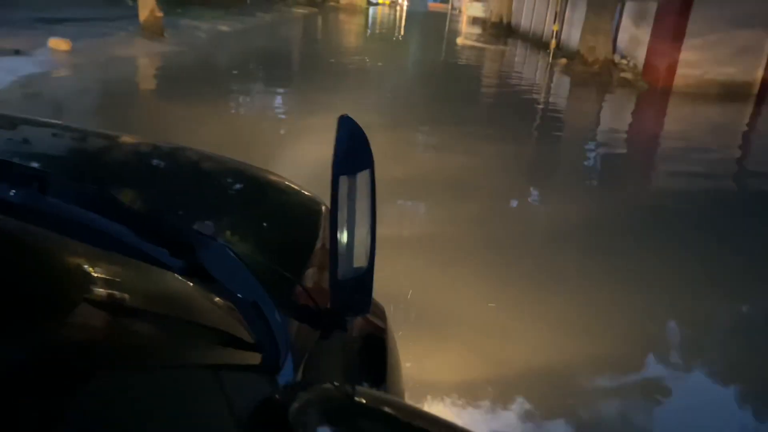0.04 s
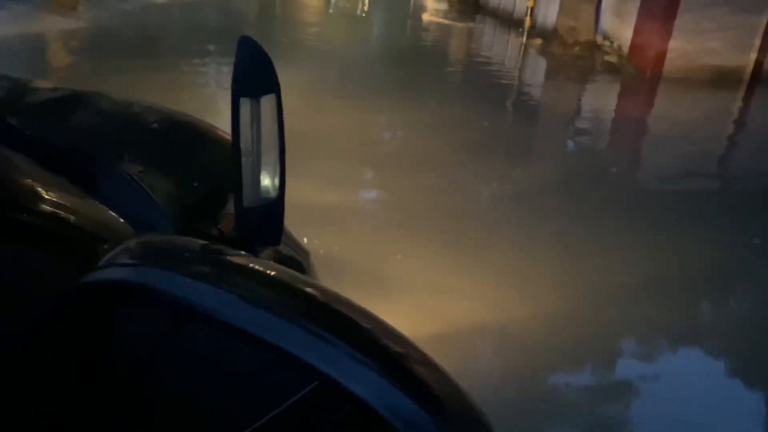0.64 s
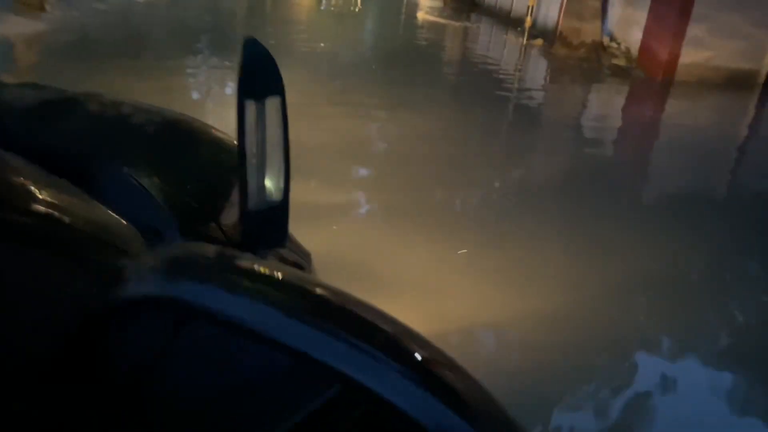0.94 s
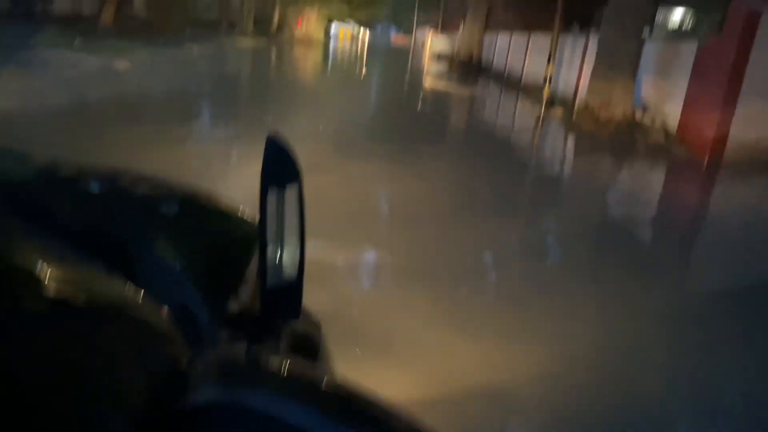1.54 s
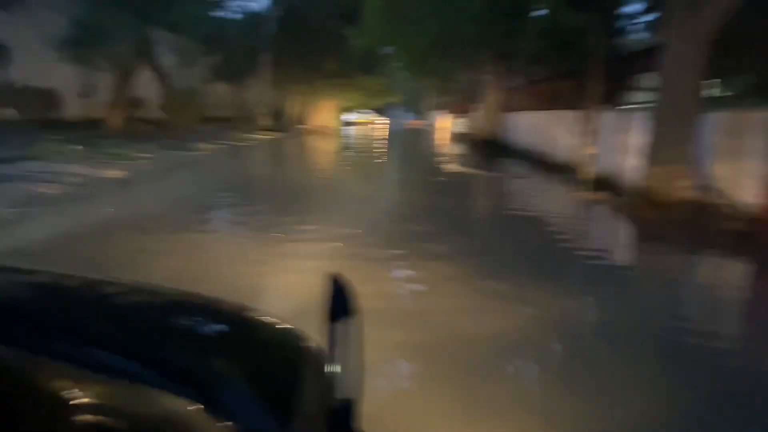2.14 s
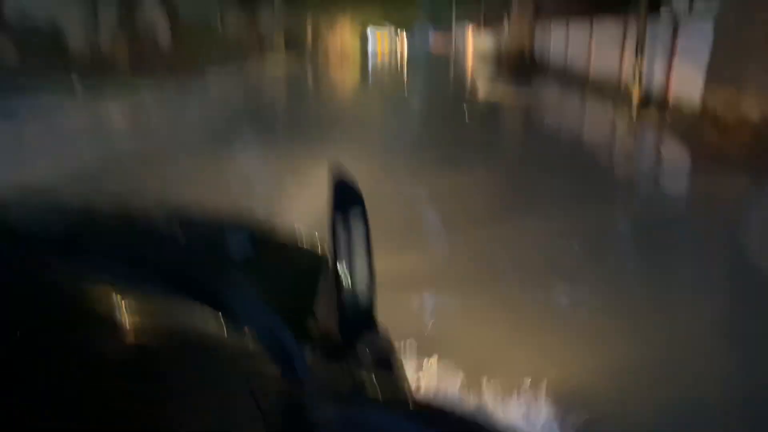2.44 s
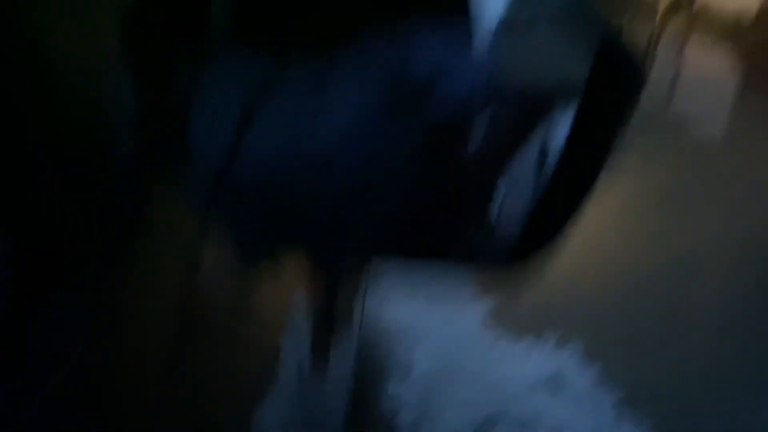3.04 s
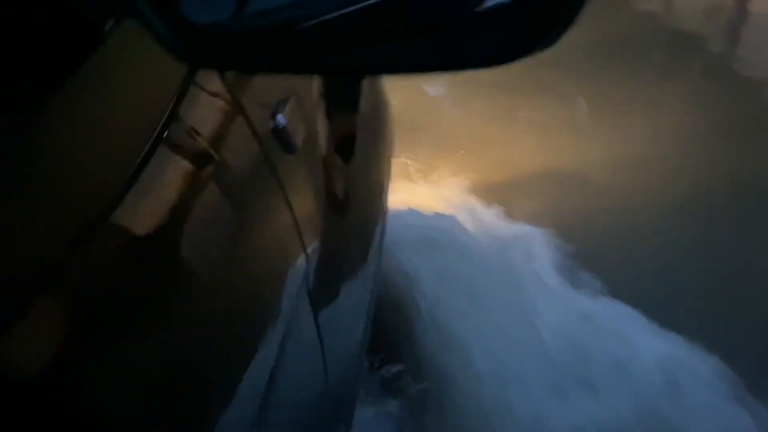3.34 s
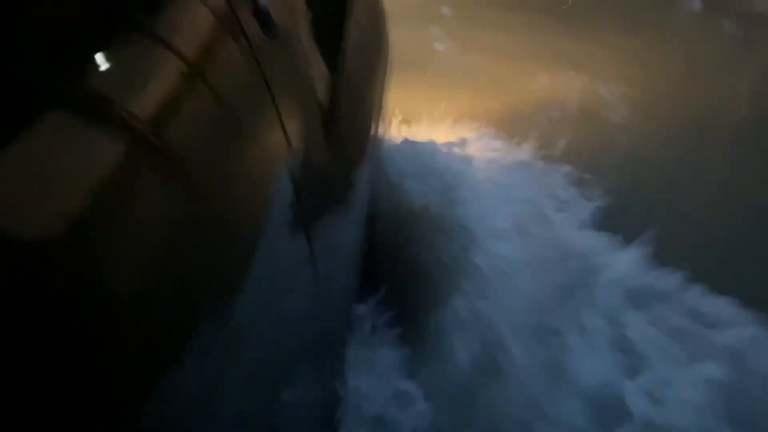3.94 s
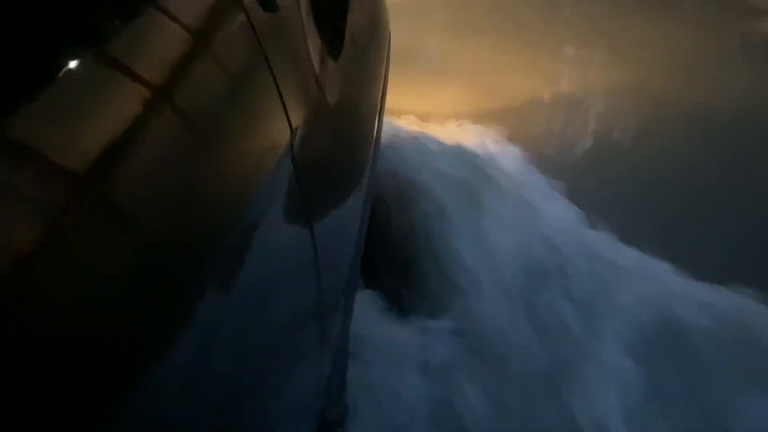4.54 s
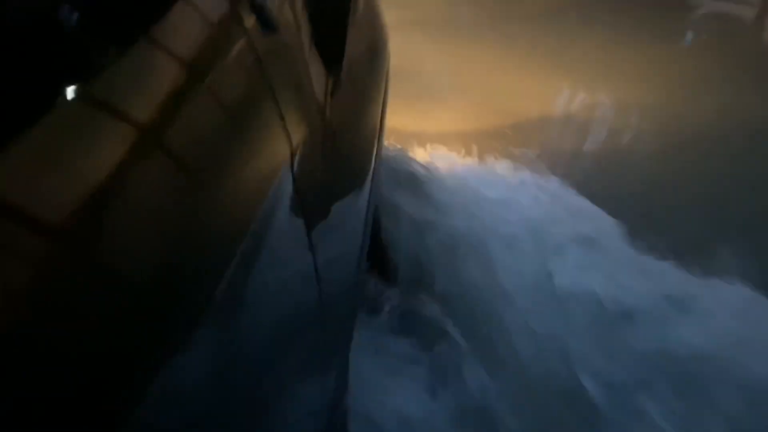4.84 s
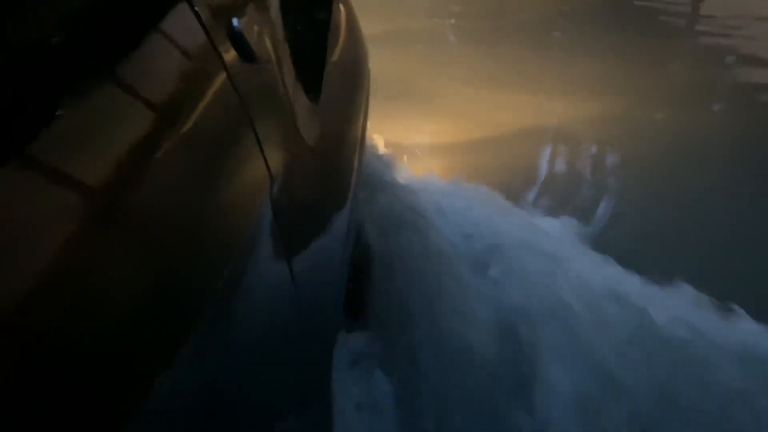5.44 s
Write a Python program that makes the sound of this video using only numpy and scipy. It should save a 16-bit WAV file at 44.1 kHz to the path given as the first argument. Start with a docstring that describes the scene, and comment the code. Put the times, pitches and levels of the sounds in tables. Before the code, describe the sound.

Close, continuous rushing and gurgling of a bow wave as a car drives through deep floodwater, with the microphone held out of the side window in low, lumpy wind. A few sharp slaps hit the panels early on. A run of hollow gulps and low thuds follows at the wheel, and the spray turns brighter. Lighter splashes, drips and one faint, thin squeak come later while the water keeps churning.

```python
"""A flooded road, heard from the open side window of a car wading through deep water.
Wind buffets the microphone as it leans out past the mirror; the front wheel sloshes and gulps air.
Waves slap, knock and thud against the body, sheets of water splat down, and one thin squeak slips by.
Up front, the bow wave churns and bubbles along the door and its crest breaks into fizzing spray."""
import sys
import numpy as np
from scipy import signal
from scipy.fft import rfft, irfft, next_fast_len
from scipy.io import wavfile
from scipy.ndimage import map_coordinates

SR = 44100
rng = np.random.default_rng(int(sys.argv[2]) if len(sys.argv) > 2 else 0)


def wav_out(sig):
    """Save sig, one row per channel (or a flat mono array), as 16-bit PCM at SR to the path in sys.argv[1]."""
    wavfile.write(sys.argv[1], SR, np.round(np.clip(np.atleast_2d(sig).T, -1, 1) * 32767).astype(np.int16))


N = 246078

# Air at the window. Each row: time in seconds, relative level in dB.
WIND_RIDE = [(0.0, -31), (0.57, -31), (1.23, -29.5), (1.66, -31.5), (2.8, -29.5), (3.12, -25.5), (3.4, -27),
             (3.67, -28), (3.95, -30.5), (4.35, -36.5), (5.02, -34), (5.58, -35.5)]
# Eddies that catch the microphone. Each row: crest time in seconds, half-length in seconds, boost in dB.
BUFFETS = [(2.26, 0.13, 3), (2.973, 0.094, 1.5), (3.6, 0.076, 5), (4.645, 0.032, 8)]
# The wind's low rumble. Each row: frequency in Hz, gain in dB.
WIND_EQ = [(20, -25), (32, -24), (48, -1.5), (65, -2.5), (110, -3), (160, -8), (260, -17), (600, -34),
           (1500, -68)]
# Sloshing at the front wheel, fading as the microphone turns back along the door.
# Each row: time in seconds, level in dB.
SLOSH_RIDE = [(0, -34), (.75, -31.5), (1.17, -28.5), (1.3, -35), (1.58, -39), (1.88, -38), (2.2, -31),
              (2.75, -37), (3.3, -23.5), (4.3, -48), (5.58, -31)]
# The hollow tone of the slosh. Each row: frequency in Hz, gain in dB.
SLOSH_EQ = [(80, -25), (140, -3), (200, -4), (320, -0.5), (480, -3), (900, -24), (3000, -60)]
# Big air pockets swallowed at the wheel arch. Each row: start in seconds, level in dB, first pitch in Hz.
GULPS = [(1.286, -20, 327), (1.669, -13.5, 634), (1.696, -15, 330), (1.991, -17, 282), (2.04, -22.5, 300),
         (2.574, -14.5, 490), (3.124, -11.5, 448), (3.308, -7.5, 350), (3.418, -15, 400),
         (3.524, -14.5, 478), (3.582, -21, 425), (3.754, -16, 490), (3.918, -17, 260), (3.934, -16, 473),
         (4.035, -18, 490), (4.225, -16, 296), (4.364, -19.5, 720), (4.481, -19, 606), (4.528, -27, 560),
         (4.619, -18, 400), (4.662, -17, 388), (4.791, -18, 400), (4.883, -23, 560), (5.09, -16.5, 450),
         (5.437, -22, 590)]
# Drops landing close by. Each row: start in seconds, level in dB, pitch in Hz.
DROPS = [(.935, -25, 6130), (4.15, -20, 6700), (4.902, -27, 3220), (5.188, -14, 14500), (5.383, -15, 14800)]
# Sheets of water landing on the flood.
# Each row: start in seconds, level in dB, band centre in Hz, seconds to fade by 60 dB.
SPLATS = [(.912, -27, 2000, 0.059), (1.311, -31, 4000, .07), (2.284, -22, 900, 0.13),
          (2.572, -24, 1000, 0.11), (3.305, -25, 650, 0.14), (4.657, -32, 3200, .08),
          (4.898, -23, 1900, .08), (5.213, -18.5, 1000, .09)]
# Low thuds of water and air. Each row: start in seconds, level in dB, pitch in Hz.
THUDS = [(0.711, -14, 71), (.85, -14.5, 109), (1.49, -14, 98), (2.176, -10, 94), (2.205, -16, 104),
         (2.303, -13, 88), (2.339, -9.5, 95), (2.381, -14, 95), (2.942, -9.5, 79.5), (3.008, -12, 89.5),
         (1.203, -10.5, 112), (1.677, -11.5, 120), (1.688, -13, 125), (1.773, -10.5, 115),
         (3.076, -5.5, 91), (3.166, -4.5, 85), (3.241, -9, 103), (3.329, -7, 90), (3.348, -9, 90),
         (3.379, -8.5, 100), (3.436, -10, 88), (3.508, -11, 110), (3.533, -4.5, 100), (3.586, -14, 99),
         (3.924, -15, 90), (4.659, -23, 95), (4.795, -23, 100), (5.42, -16.5, 90)]
# Waves hitting a panel. Each row: start in seconds, level in dB, first pitch in Hz,
# seconds for the pitch to halve, length in seconds.
KNOCKS = [(.923, -14, 950, .004, .014), (.996, -14, 950, .007, .01), (1.095, -14, 850, .004, .016),
          (1.1895, -10.5, 450, .0025, .012), (1.6632, -5, 800, .003, .013),
          (1.7557, -2.5, 1700, .0019, .02)]
# Water slapping the body. Each row: start in seconds, level in dB, pitch of the trapped air in Hz,
# ring length in cycles, bend as a share of the pitch.
SLAPS = [(.357, -19, 1060, 4.8, -0.06), (0.645, -17.5, 1080, 8.1, -.1), (1.04, -12, 1200, 4, -.11),
         (1.157, -16, 557, 4.4, -0.12), (1.1766, -3, 900, 4.6, -.1), (1.186, -9.5, 780, 3.5, -.1),
         (1.652, -16, 1100, 4.2, -.2), (1.6612, -6, 950, 3.4, -.1), (1.7375, -7, 1500, 3.2, -.15),
         (1.7572, -6.5, 680, 3.6, -.05), (2.286, -15, 900, 4.6, -.1), (2.46, -17, 1000, 5.4, -.1),
         (3.335, -14, 900, 5.3, -0.082), (3.97, -18, 615, 5, -0.072), (4.076, -17, 757, 6.8, -0.11),
         (4.219, -19, 1200, 4.9, -.2), (4.445, -20, 680, 8.7, -0.075), (4.799, -13.5, 1080, 4.1, -0.13),
         (5.223, -15, 1000, 6.2, -0.16), (5.39, -19, 950, 7, -0.032)]
# The tone of the froth a slap throws up. Each row: frequency in Hz, gain in dB.
FROTH_EQ = [(60, -17), (150, 1), (330, 2), (800, 5), (1400, -10), (2200, -18), (6000, -53)]
# Spray off the breaking crest. Each row: time in seconds, relative level in dB.
SPRAY_RIDE = [(0.0, -39), (0.85, -35.5), (2.39, -36), (3.04, -33.5), (3.23, -32), (4.49, -32),
              (4.77, -31.5), (5.58, -34)]
# The spray's bright hiss. Each row: frequency in Hz, gain in dB.
SPRAY_EQ = [(500, -25), (1300, -3), (2100, 1), (3100, -1), (4700, -2.5), (6300, -5.5), (8500, -6.1),
            (15800, -8.2)]
# The flow churning along the door. Each row: time in seconds, relative level in dB.
CHURN_RIDE = [(0.0, -27), (0.46, -27), (0.96, -25), (1.4, -25.5), (2.2, -26.5), (3.02, -25), (3.29, -24),
              (3.75, -23.5), (4.35, -24), (4.72, -22), (5.0, -24), (5.58, -24)]
# The churn's full midrange. Each row: frequency in Hz, gain in dB.
CHURN_EQ = [(50, -28), (130, -6.5), (230, -2.5), (400, -0.5), (800, -0.1), (1200, -2.5), (1700, -7.5),
            (2600, -12), (5000, -20.5), (12000, -44)]
# Where the churn sits as the microphone turns. Each row: time in seconds, left minus right in dB.
CHURN_PAN = [(0, 0.5), (2.6, -1.6), (3.3, 0), (4.3, 1.2), (5.58, 1)]
# The wave heaps up and topples.
# Each row: crest time in seconds, half-length in seconds, churn boost in dB, spray boost in dB.
BREAKS = [(1.097, 0.09, 1.5, -2), (2.49, 0.029, 2, 2.5), (2.57, 0.054, 1, 2), (2.693, 0.02, 1.5, 0.5),
          (3.142, 0.06, 0.5, 3), (3.306, 0.1, 2, 2), (3.575, 0.025, 2.5, 1.5), (3.946, .04, 1, 2.5),
          (4.656, 0.065, 0.5, 0.5), (4.884, 0.051, 1, 2), (5.086, 0.045, 2.5, 3)]
# Stereo image of the noise layers. Each row: frequency in Hz, left-right likeness (1 is mono).
LIKENESS = [(60, .89), (250, .75), (700, .83), (1400, .79), (3100, .5), (4200, .55), (5600, .15),
            (7000, .97), (8500, .99)]
# The wave side is louder. Each row: frequency in Hz, left minus right in dB.
BALANCE = [(100, -0.2), (700, -0.5), (1300, -0.3), (2400, 1), (5000, 4), (7000, -0.5), (15000, 2)]
# Stereo widening by phase. Each row: frequency in Hz, lead of the right channel in cycles.
PHASE_LEAD = [(300, 0), (1400, -.03), (3100, -.08), (5400, 0), (7300, 0), (8700, .5), (9350, .5),
              (10650, 1), (11450, 1), (12800, 1.5), (13500, 1.5), (14850, 2)]


def amp(db):
    """Decibels to gain."""
    return 10 ** (np.asarray(db) / 20)


def unit(x):
    """Scale to rms 1."""
    return x / np.sqrt(np.mean(x ** 2) + 1e-20)


def along(points, hz):
    """Read (Hz, value) points on a log axis."""
    freqs, values = np.transpose(points)
    return np.interp(np.log(hz + 1), np.log(freqs + 1), values)


def ride(points):
    """A fader move: (seconds, value) points joined into one value per sample."""
    return np.interp(np.arange(N) / SR, *np.transpose(points))


def swell(s, half):
    """A smooth rise to 1 at time s and a fall back, half seconds to either side."""
    return np.exp(-((np.arange(N) / SR - s) / half) ** 2)


def wobble(rate):
    """A smooth random curve, rate knots a second."""
    return map_coordinates(rng.standard_normal(int(N * rate / SR) + 4), [np.arange(N) * rate / SR])


def filtered(x, response):
    """Shape x with a frequency response."""
    size = next_fast_len(N + 8192)
    return irfft(rfft(x, size) * response(np.fft.rfftfreq(size, 1 / SR)), size)[..., :N]


def spread(pair, eq):
    """EQ two unrelated signals and mix them as mid and side into stereo of rms 1."""
    def response(hz):
        width = np.arccos(np.clip(along(LIKENESS, hz), -1, 1)) / 2
        return amp(along(eq, hz)) * [np.cos(width), np.sin(width)]
    mid, side = filtered(pair, response)
    return unit(np.array([mid + side, mid - side]))


def add(track, s, sound):
    """Mix a sound into the track at time s."""
    part = track[round(s * SR):][:len(sound)]
    part += sound[:len(part)]


def wind():
    """Eddies at the window and the drone of the car make a lumpy rumble."""
    level_db = ride(WIND_RIDE) + sum(db * swell(s, half) for s, half, db in BUFFETS)
    lumps = unit(amp(1.5 * wobble(30)))
    return amp(level_db + 4.0) * lumps * spread(rng.standard_normal((2, N)), WIND_EQ)


def squeak(s, length, hz, db):
    """One thin squeak, centred on time s, sounds through the wash and sags as it ends."""
    progress = np.clip(2 * (np.arange(N) / SR - s) / length, -2, 2)
    pitch = hz * (1 - 0.04 * np.maximum(progress, 0) ** 4 + 0.002 * wobble(200))
    return amp(db) * np.exp(-progress ** 4) * np.sin(2 * np.pi * np.cumsum(pitch) / SR)


def slosh():
    """Deep water heaves around the front wheel in short, hollow surges."""
    heave = unit(amp(1.4 * wobble(25)))
    return amp(ride(SLOSH_RIDE)) * heave * spread(rng.standard_normal((2, N)), SLOSH_EQ)


def gulp(t, hz, end_hz, fall_s, rise_s):
    """A swallowed air pocket of peak 1: its pitch sinks quickly towards a low boom."""
    turns = end_hz * t + (hz - end_hz) * fall_s * (1 - np.exp(-t / fall_s))
    return t / rise_s * np.exp(1 - t / rise_s) * np.sin(2 * np.pi * turns)


def small_gulps(churn_db, count, typical_hz):
    """The wheel swallows small air pockets at uneven intervals, louder when the flow is strong."""
    out, t = np.zeros(N), np.arange(SR // 8) / SR
    for k, (when, strength, pitch) in enumerate(rng.random((count, 3))):
        at = int((k + when) / count * N)
        db = churn_db[at] + 6 * (strength - .5)
        hz = typical_hz * 2 ** (pitch - .5)
        add(out, at / SR, amp(db) * gulp(t, hz, end_hz=136, fall_s=0.0074, rise_s=0.0029))
    return out


def pocket(t, hz, cycles, glide):
    """Trapped air rings: it swells to peak 1 and dies away as its pitch bends by the share glide."""
    rise = cycles / (4 * hz)
    age = np.minimum(t / rise, 40)
    bent_time = t + glide * (t - 2 * rise * (1 - np.exp(-age / 2)))
    return age * np.exp(1 - age) * np.sin(2 * np.pi * hz * bent_time)


def splat(t, hz, t60):
    """A sheet of water lands: a sudden burst of noise around one pitch."""
    band = signal.butter(2, [hz / 2, min(hz * 1.5, SR / 3)], "bandpass", fs=SR, output="sos")
    return unit(signal.sosfilt(band, rng.standard_normal(len(t)))) * amp(-60 * t / t60)


def knock(t, hz, fall_s, length, attack_s=.0002, roughness=.4, flutter_hz=450):
    """A wave breaks on a panel: a ragged blow whose pitch dives and takes the level down with it."""
    dive = 1 + t / fall_s
    shake, waver = roughness * wobble(flutter_hz)[:2 * len(t)].reshape(2, -1)
    envelope = (1 - np.exp(-t / attack_s)) * dive ** -.55 * np.exp(-(t / length) ** 4)
    pitch = hz * np.exp(waver / 2) / dive
    return envelope * (1 + np.tanh(shake)) * np.sin(2 * np.pi * np.cumsum(pitch) / SR)


def splashes():
    """The spot hits, in mono: slaps ring, knocks and gulps dive, thuds push, splats spatter, drops tick."""
    out, t = np.zeros(N), np.arange(SR // 8) / SR
    for s, db, hz, cycles, bend in SLAPS:
        add(out, s, amp(db) * pocket(t, hz, cycles, glide=bend))
    for s, db, hz, fall_s, length in KNOCKS:
        add(out, s, amp(db) * knock(t, hz, fall_s, length))
    for s, db, hz in GULPS:
        add(out, s, amp(db) * gulp(t, hz, end_hz=105, fall_s=0.00686, rise_s=0.0041))
    for s, db, hz in THUDS:
        add(out, s, amp(db) * pocket(t, hz, cycles=1.7, glide=-0.089))
    for s, db, hz, t60 in SPLATS:
        add(out, s, amp(db) * splat(t, hz, t60))
    for s, db, hz in DROPS:
        add(out, s, amp(db) * pocket(t, hz, cycles=13.0, glide=0.13))
    return out


def froth(attack_s=0.0005, t60=0.2):
    """Each slap throws up a short, rough wash of water."""
    envelope, t = np.zeros(N), np.arange(SR // 5) / SR
    burst = (1 - np.exp(-t / attack_s)) * amp(-60 * t / t60)
    for s, db, *_ in SLAPS:
        add(envelope, s, amp(db - 16.0) * burst)
    return envelope * spread(rng.standard_normal((2, N)), FROTH_EQ)


def bubbles(low_hz, high_hz, cycles, scatter_db, glide, count, samples):
    """A cloud of ringing bubbles, mostly faint with a few strong, as two unrelated signals."""
    when, pitch, strength, life, angle = rng.random((count, 5)).T
    hz = low_hz * (high_hz / low_hz) ** pitch
    gain = amp(-scatter_db * np.log(np.maximum(strength, .01))) * hz
    t = np.arange(samples) / SR
    rings = pocket(t, hz[:, None], cycles * (.5 + life[:, None]), glide) * gain[:, None]
    at = ((when * N).astype(int)[:, None] + np.arange(samples)).ravel()
    sends = np.cos(2 * np.pi * angle), np.sin(2 * np.pi * angle)
    return unit(np.array([np.bincount(at, (rings * send[:, None]).ravel(), N)[:N] for send in sends]))


def spray(level_db, surge):
    """The crest breaks into foam: tiny bursting bubbles on a hiss, in quick spurts."""
    fizz = bubbles(1792, 14600, cycles=11.4, scatter_db=1.8, glide=0.062, count=16000, samples=300)
    foam = rng.standard_normal((2, N)) + amp(-6.5) * fizz
    spurts_db = 0.28 * surge + 0.94 * wobble(70)
    return amp(level_db + 3.5 + spurts_db) * spread(foam, SPRAY_EQ)


def churn(level_db, surge):
    """The bow wave folds air under: a dense roar with large bubbles gurgling in it."""
    gurgle = bubbles(300, 2400, cycles=8, scatter_db=1.5, glide=-0.06, count=2000, samples=1600)
    roar = rng.standard_normal((2, N)) + amp(-16.5) * gurgle
    tumble_db = .45 * surge + 0.24 * wobble(35)
    pan = amp(np.outer([.5, -.5], ride(CHURN_PAN)))
    return amp(level_db + 1.1 + tumble_db) * spread(roar, CHURN_EQ) * pan


def scene():
    """The mix: churn and spray surge together as the wave tumbles, with hits on top and wind below."""
    churn_db = ride(CHURN_RIDE) + sum(db * swell(s, half) for s, half, db, _ in BREAKS)
    spray_db = ride(SPRAY_RIDE) + sum(db * swell(s, half) for s, half, _, db in BREAKS)
    surge = wobble(16)
    water = churn(churn_db, surge) + slosh() + spray(spray_db, surge)
    water += splashes() + froth() + small_gulps(churn_db, count=12, typical_hz=413)
    mix = water + squeak(s=4.63, length=.085, hz=3375, db=-31.5) + wind()
    return filtered(mix, lambda hz: amp(np.outer([.5, -.5], along(BALANCE, hz))))


def record(dry):
    """The master: widen the stereo by phase, thin the deepest bass and cut off the very top."""
    low_cut_hz, top_hz = 30, 15900
    wide = filtered(dry, lambda hz: np.exp(np.outer([-1j, 1j], np.pi * along(PHASE_LEAD, hz))))
    return filtered(wide, lambda hz: (hz < top_hz) * hz ** 2 / np.hypot(hz ** 2, low_cut_hz ** 2))


dry = scene()
out = record(dry)
wav_out(out)
```